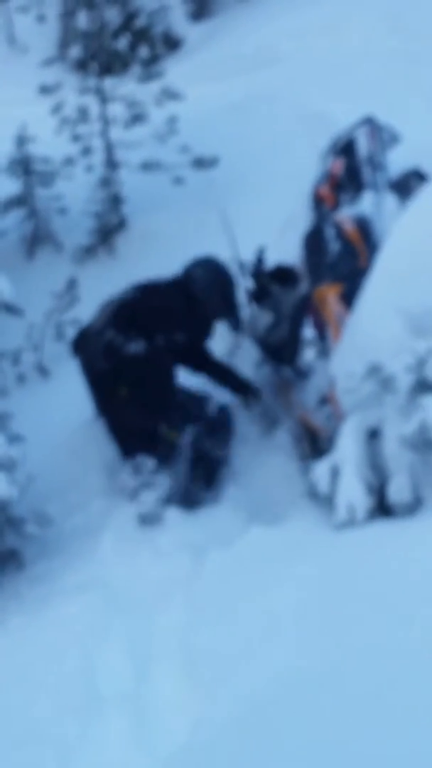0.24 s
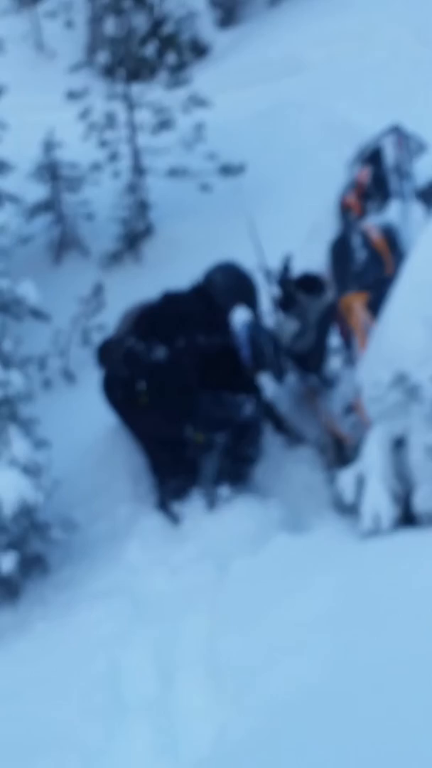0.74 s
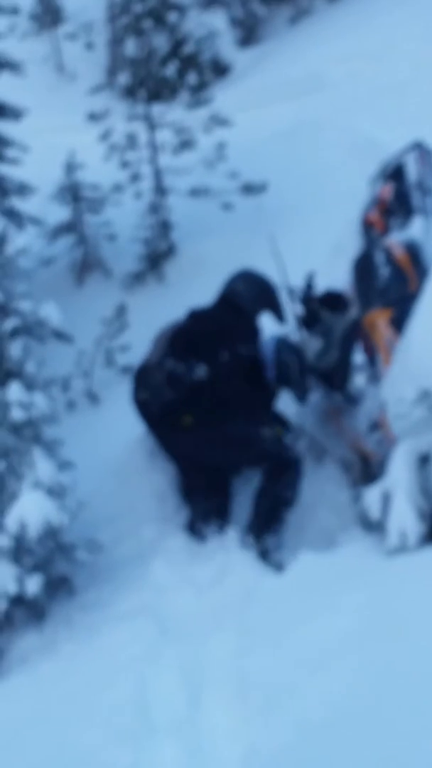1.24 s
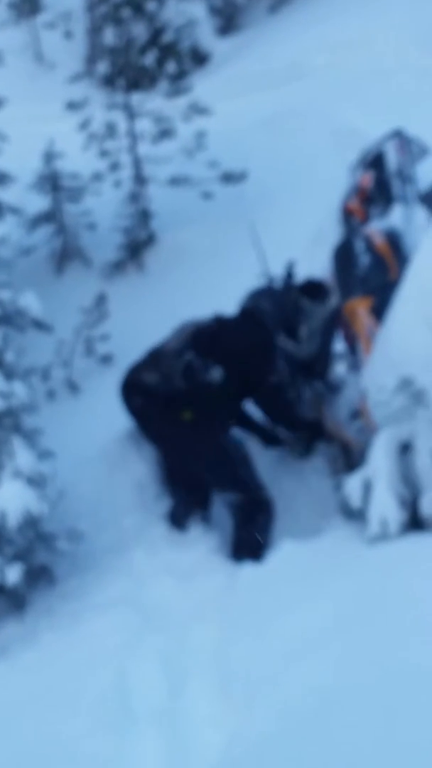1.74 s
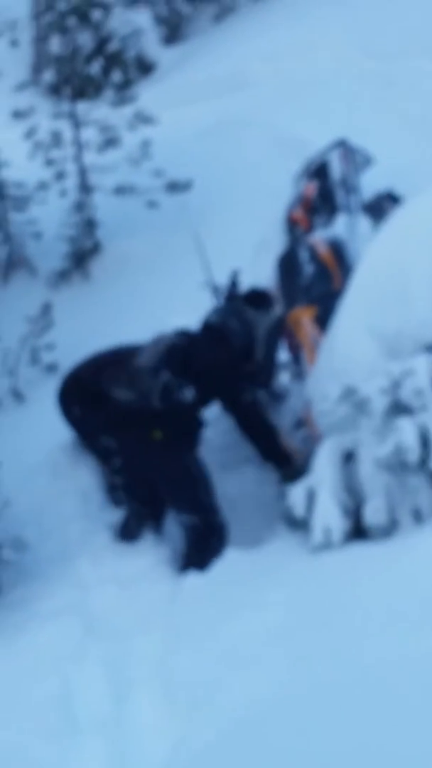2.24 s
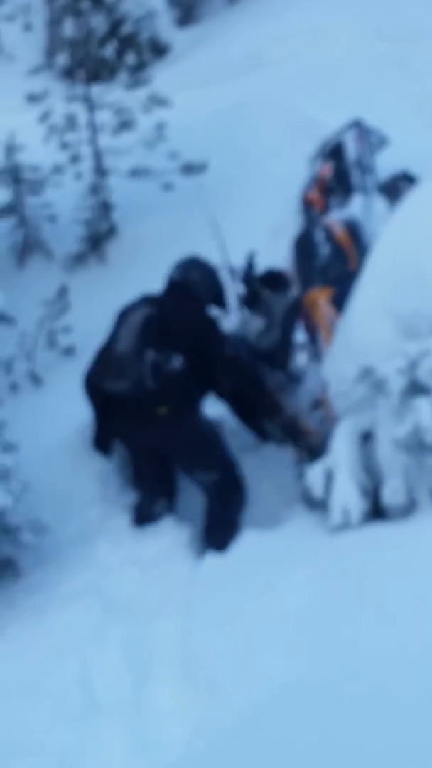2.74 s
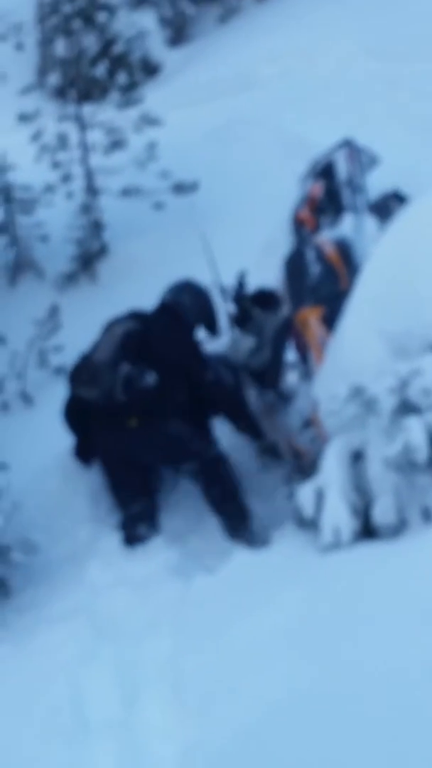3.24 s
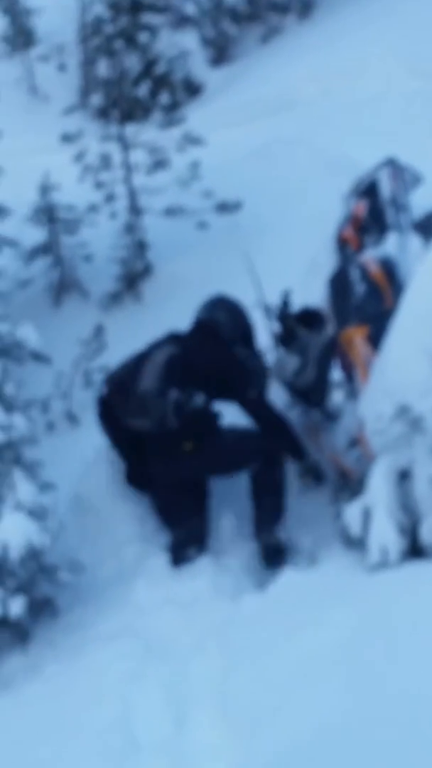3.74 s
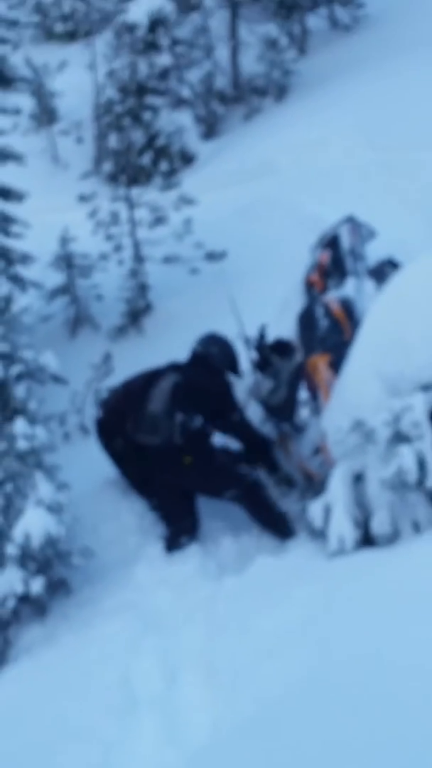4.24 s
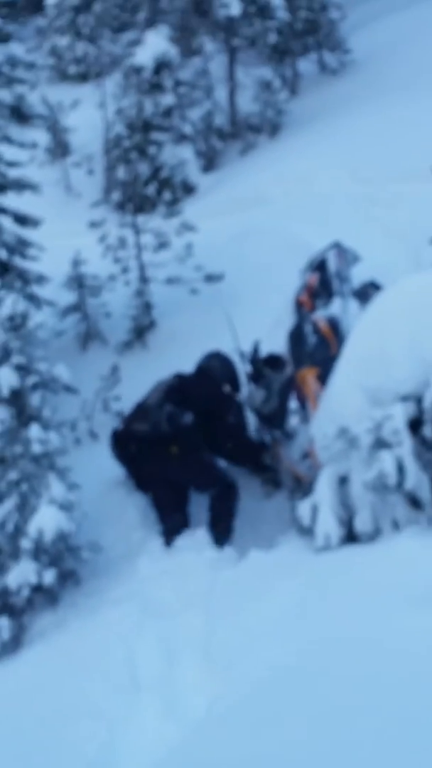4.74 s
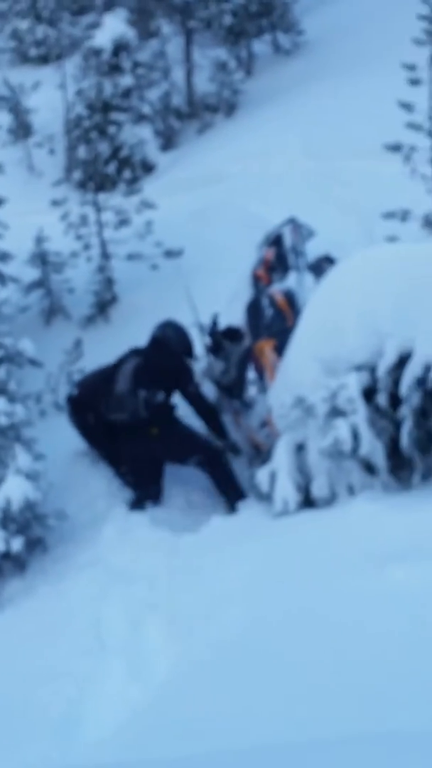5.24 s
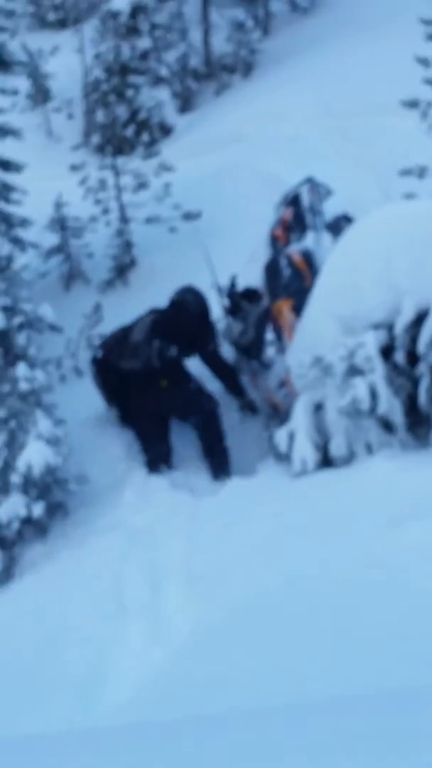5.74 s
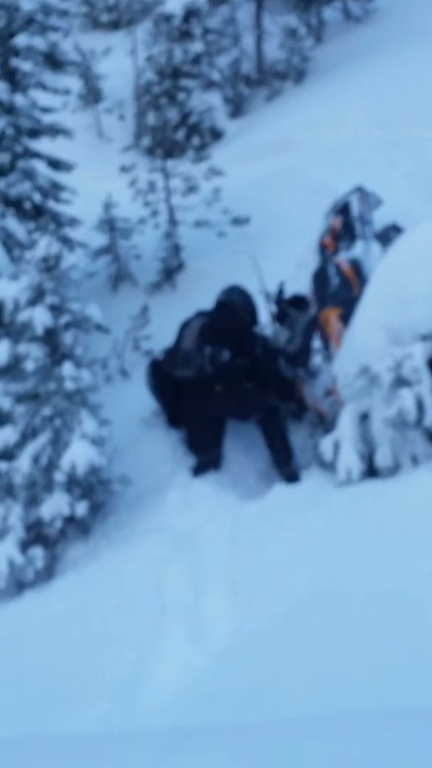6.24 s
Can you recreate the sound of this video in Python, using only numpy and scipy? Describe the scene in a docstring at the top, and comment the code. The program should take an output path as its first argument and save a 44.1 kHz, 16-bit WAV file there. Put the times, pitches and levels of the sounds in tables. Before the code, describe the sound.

Steady low engine drone with raspy gas noise and hiss, outdoors and fairly dry, heard by a handheld phone. A quick rev jumps up and drops back, then the speed winds down over several seconds, the burns growing uneven and the tone deeper. Faint taps and ticks join in; the image widens from nearly mono. Stiff fabric finally drags and catches close up.

```python
"""Out in deep snow, a two-cylinder two-stroke snowmobile engine runs some metres off: a fast idle, one blip
of the throttle, then a slow fall to a lumpy idle with uneven burns and a tick once a turn.
The exhaust is a stack of crank orders with booming bursts; gas rush is coloured noise pulsing with the firing.
Near the phone, stiff clothing knocks, drags and catches: grainy noise through small resonances."""
import sys
import numpy as np
from scipy.fft import rfft, irfft, next_fast_len
from scipy.io import wavfile
from scipy.ndimage import uniform_filter1d, map_coordinates

SR = 44100
rng = np.random.default_rng(int(sys.argv[2]) if len(sys.argv) > 2 else 0)


def transcribe(signal):
    """Save signal, clipped to [-1, 1], as a 16-bit WAV file at the path in sys.argv[1]."""
    frames = np.atleast_2d(signal).T
    limited = np.clip(frames, -1, 1)
    pcm = np.round(limited * 32767).astype(np.int16)
    wavfile.write(sys.argv[1], SR, pcm)


N = 285627

# Engine speed and firing tone: (time [s], speed [crank turns/s], level [dB])
CRANK = [(0, 66, -28), (.36, 65.9, -27.5), (.7, 66.2, -30.5), (.97, 63.8, -31), (1.22, 64.7, -25.5),
         (1.3, 68, -18.5), (1.41, 77.5, -24), (1.48, 73, -25.5), (1.66, 60.7, -29), (1.8, 59.6, -34),
         (2.12, 55, -27.5), (2.32, 52, -39), (2.4, 52.4, -33), (2.86, 48.5, -37.5), (3.12, 48.8, -41.5),
         (3.77, 42.6, -34), (4.16, 41.2, -30.5), (4.43, 40.8, -34.5), (4.72, 39.5, -33.5),
         (5.13, 40.1, -33), (5.8, 37.2, -33.5), (6.25, 34.1, -39), (6.477, 35, -36)]
# Weaker crank orders, before pipe and load: (order [per turn], relative level [dB])
MINOR_ORDERS = [(1, -7), (3, -4.5), (4, -4.5), (5, -3), (6, -0.5), (7, -6.5), (8, -3.5), (9, -11.5),
                (10, -8.5), (11, -11.5), (12, -6)]
# How the pipe passes the weaker orders: (frequency [Hz], gain [dB])
PIPE = [(36, -50.5), (60, -42), (150, -36.5), (250, -49), (350, -43.5), (480, -48.5), (560, -48),
        (900, -57), (1300, -56), (1740, -51), (1900, -57.5), (2100, -69.5)]
# Spells when an order sings out, by order [per turn]: (start [s], end [s], level [dB])
SINGING_ORDERS = {4: [(1.23, 1.45, -30.5), (1.6, 2.65, -41), (3.6, 4.1, -41.5), (4.0, 4.75, -36),
                  (4.7, 5.7, -41.5), (5.65, 6.7, -41.5)], 5: [(.2, 2.9, -48), (2.6, 3.5, -43),
                  (3.95, 4.5, -43)], 6: [(-.3, 1.39, -32.5), (1.45, 1.7, -31.5), (1.9, 3.65, -42),
                  (3.5, 4.7, -42), (4.65, 6.76, -48.5)], 8: [(-.1, .68, -45.5), (1.22, 1.4, -41),
                  (1.85, 2.8, -47), (3.15, 3.55, -42.5), (3.45, 4.1, -34.5), (4.05, 5.45, -42)],
                  10: [(1.25, 1.75, -47.5), (3.2, 3.9, -49), (5.95, 6.7, -43)], 14: [(.95, 1.42, -44.5),
                  (2.05, 2.55, -50)], 16: [(.95, 1.3, -47), (1.32, 1.55, -40)], 18: [(1.3, 1.5, -36.5)]}
DRIFT_DB = 2.5  # how far the weak orders swell and sink
FADE_S = 0.072  # rise of a spell, and its usual fall

# Strong burns: (time [s], relative peak level [dB])
STRONG_BURNS = [(0.128, -25), (0.25, -14.5), (1.572, -14), (1.723, -14.5), (1.868, -12.5), (1.995, -13),
                (2.125, -17), (2.233, -12), (2.3, -13.5), (2.469, -15.5), (2.734, -14.5), (2.879, -13),
                (3.029, -12.5), (3.41, -16.5), (3.536, -14.5), (3.745, -18.5), (3.913, -16.5),
                (4.114, -15.5), (4.286, -17), (4.408, -16.5), (4.591, -22), (4.989, -17), (5.074, -16.5),
                (5.144, -19), (5.195, -21.5), (5.451, -19.5), (5.53, -19), (5.626, -12.5), (5.758, -16.5),
                (5.821, -20), (5.936, -19), (6, -22), (6.04, -21), (6.158, -23.5), (6.228, -20.5),
                (6.454, -14.5)]
# Muffler colour on the burn scatter: (frequency [Hz], density [dB per Hz])
MUFFLER = [(25, -38.5), (45, -13), (65, -7.5), (85, -12.5), (110, 3.5), (140, -3.5), (195, -13),
           (287, -15.5), (340, -12), (470, -18), (530, -24.5), (700, -24), (1000, -85.5)]
UNEVEN_DB = -30  # burn scatter, before the speed corrections
UNEVEN_DIP, FAST_IDLE = 0.05, 66  # dB lost per turn/s above this speed [turns/s]
UNEVEN_SINK = 0.16  # dB lost per turn/s below MEAN_TURNS
MEAN_TURNS = 50  # turns/s at which the mean gas levels hold

# Gas noise colours, each: (frequency [Hz], density [dB per Hz])
DRONE = [(280, -30.5), (480, -0.5), (562, -12), (753, -0.5), (900, -3.5), (1100, -1.5), (1180, 1),
         (1270, -4.5), (2860, -120)]
INTAKE = [(740, -44), (1250, -13), (1375, 1.5), (1600, 1), (1730, 4), (1850, -1), (2030, -2), (2200, -14.5),
          (2860, -42.5), (4800, -120)]
BUZZ = [(1290, -39.5), (2200, 0.5), (2460, 9.5), (2790, -12.5), (3030, -12.5), (3300, -9), (4290, -56.5),
        (7260, -120)]
HISS = [(1820, -33.5), (3100, 2), (4210, 0), (4680, -3), (5550, -8.5), (6430, -24.5), (6800, -61.5),
        (15000, -120)]
AIR = [(5590, -64), (9500, -25.5), (10200, -21), (11000, -3), (12500, 11), (14000, 7.5), (14900, -11.5)]
# A narrow whir over the buzz: (frequency [Hz], density [dB per Hz])
WHIR = [(2400, -34.5), (2700, 5.5), (3080, -2), (3300, -29), (6000, -120)]
# Swing of the gas noise: (time [s], roar swing [dB], treble swing [dB])
FLOW_SWING = [(0, -1.5, -7), (.63, 1, -2), (.71, -2, 9), (.8, -9.5, 10), (.9, 3, 4), (1.22, 2, 4.5),
              (1.31, 5.5, 7.5), (1.39, 12.5, 9), (1.46, 1, 12), (1.6, 4.5, 4), (1.84, 3.5, 1), (2.38, 5, 3),
              (2.6, 2, 4.5), (3.1, 1.5, -4), (3.79, -1, -5.5), (4.13, -5, -3), (5.25, -12, -5.5),
              (5.4, -7.5, 12.5), (5.6, -10.5, 6.5), (6.477, -13, 2.5)]
# Rows drone, intake rasp, buzz, hiss, air:
# (mean level [dB], share of roar swing [dB/dB], share of treble swing [dB/dB], rise with speed [dB per turn/s])
FLOW_RESPONSE = [(-44.5, 0.35, 0.11, 0.2676), (-44.5, 0.97, .01, 0.15), (-55, 0.61, 0.021, 0.3239),
                 (-60.5, 0.11, 0.74, 0.1471), (-55.5, .01, 0.72, 0.2678)]
# The hiss stands higher for a while: (start [s], end [s], lift [dB])
HISS_LIFT = (0.69, 3.18, 5)
HISS_RELEASE_S = 0.55  # it sinks back slowly
WHIR_DB, WHIR_DROPS_S, WHIR_DROP_DB = -58.5, 2.93, 18.5  # mean level, time and depth of its drop

# Fizzing tick: (time [s], level [dB])
TICKING = [(0, -71.5), (3.7, -63.5), (4.1, -58), (5.05, -61), (5.2, -69), (5.6, -61.5), (6.477, -64.5)]
# Steady hums that come and go: (start [s], end [s], frequency [Hz], level [dB])
HUMS = [(0.2, 0.57, 111.4, -34), (2, 7, 108, -32.5), (3.35, 4.1, 481.8, -45.5), (4.9, 5.3, 493, -46.5)]
# One short swell of narrow hiss: (start [s], end [s], level [dB], frequency [Hz], width [Hz])
WHOOSH = (.65, .92, -53, 3850, 900)
# Spells of sharp firing: (start [s], end [s], level [dB], frequency [Hz], width [Hz])
BARK = [(1.9, 3.15, -45.5, 1910, 280), (1.9, 2.6, -48, 1150, 180)]
# Dull taps: (time [s], level [dB])
TAPPING = [(4.1, -96), (4.3, -65), (4.65, -62.5), (4.8, -62.5), (5.22, -64), (5.34, -90)]
# Metal resonances the taps ring: (frequency [Hz], width [Hz], relative level [dB])
METAL = [(2450, 300, -6), (3330, 260, 1), (4700, 600, -10)]

# Dull knock: (time [s], peak level [dB])
KNOCK = [(5.376, -14)]
# Cloth dragging: (start [s], end [s], fizz [dB], four weave bands from low to high [dB], ring [dB])
STROKES = [(6.034, 6.125, -48, -60, -62, -63, -57, -70), (6.131, 6.166, -31, -48, -53, -52, -44, -58),
           (6.154, 6.188, -29, -45, -50, -46, -41, -45), (6.178, 6.196, -31, -46, -52, -39, -45, -41),
           (6.192, 6.21, -47, -47, -56, -56, -54, -50), (6.236, 6.252, -33, -45, -38, -43, -42, -39),
           (6.248, 6.266, -35, -46, -44, -43, -46, -39), (6.205, 6.335, -53, -61, -63, -62, -60, -60)]
# Four cloth bands from low to high, then the hollow ring: (frequency [Hz], width [Hz], relative level [dB])
WEAVE = [
    [(1840, 200, 0), (2170, 140, 1), (2500, 220, -1)],
    [(2910, 130, 0)],
    [(3390, 200, 0)],
    [(3750, 110, 0), (4130, 150, 1), (4460, 150, -2), (4900, 300, -8)],
    [(1135, 60, 0)],
]
WEAVE_TOP_HZ = 5400  # the weave dulls above this
SLIPS_PER_S, SLIP_DB = 600, 16.5  # threads let go at random, each a spike over the rubbing noise
# Cloth catching: (time [s], relative peak level [dB])
SNAGS = [(6.035, -21), (6.041, -25), (6.054, -31), (6.064, -27), (6.076, -22), (6.089, -25), (6.101, -25),
         (6.127, -27), (6.325, -37)]
SNAG_T60 = .012  # s to die by 60 dB

# Port difference under the sum: (frequency [Hz], gain [dB])
UNLIKE = [(60, -27), (180, -33), (540, -21), (1610, -14.5), (4840, -7.5), (14500, -12.5)]
# Stereo width of the engine, nearly mono at first, wide from about 4 s:
# (time [s], gain of the port difference [dB])
WIDTH = [(0, -62.5), (3.85, -56.5), (4.1, -6.5), (5.4, 1.5), (6.477, -2)]
TOP_HZ = 15000  # band limit of the phone


def amp(db):
    """Decibels to gain."""
    return 10 ** (np.asarray(db) / 20)


def unit(x):
    """Scaled to rms 1."""
    return x / np.sqrt(np.mean(x ** 2) + 1e-20)


def curves(rows):
    """One value per sample for each column after the time."""
    s, *cols = np.transpose(rows)
    return [np.interp(np.arange(N) / SR, s, c) for c in cols]


def wobble(rate):
    """A smooth random curve, rate knots a second."""
    knots = rng.standard_normal(int(N * rate / SR) + 4)
    return map_coordinates(knots, [np.arange(N) * rate / SR])


def filtered(x, response):
    """x times a response of frequency."""
    m = next_fast_len(N + SR // 2)
    return irfft(rfft(x, m) * response(np.fft.rfftfreq(m, 1 / SR)), m)[..., :N]


def along(points, hz):
    """(Hz, dB) points read on a log axis."""
    f, db = np.transpose(points)
    return np.interp(np.log(hz + 1), np.log(f + 1), db)


def coloured(x, points):
    """x through a (Hz, dB) spectrum, at rms 1."""
    return unit(filtered(x, lambda hz: amp(along(points, hz))))


def resonances(rows):
    """Causal response of (Hz, width Hz, dB) resonances."""
    return lambda f: sum(amp(db) * w / (w + 2j * (f - c)) for c, w, db in rows)


def spell(start, end, release=FADE_S):
    """A gate that fades in from start and is closed again by end."""
    t = np.arange(N) / SR
    return np.clip(np.minimum((t - start) / FADE_S, (end - t) / release), 0, 1)


def puffs(turns, sharpness):
    """A gate that opens once in each whole step of turns, sudden and then dying."""
    return np.exp(-sharpness * (turns % 1))


def flow_db():
    """Levels of the gas noises, from the roar, the treble and the engine speed."""
    roar, treble = curves(FLOW_SWING)
    faster = curves(CRANK)[0] - MEAN_TURNS
    drone, rasp, buzz, hiss, air = [db + a * roar + b * treble + c * faster for db, a, b, c in FLOW_RESPONSE]
    start, end, lift_db = HISS_LIFT
    hiss = hiss + lift_db * spell(start, end, HISS_RELEASE_S)
    whir = WHIR_DB + 0.7 * roar + 0.34 * faster
    whir = whir - WHIR_DROP_DB * spell(WHIR_DROPS_S, np.inf)  # stays down to the end
    return drone, rasp, buzz, hiss, air, whir


def exhaust(turns):
    """Steady firing sounds the second crank order; the others pass the pipe weakly and sing out in spells."""
    speed, firing_db = curves(CRANK)
    load_db = .5 * (flow_db()[0] + 38.0)  # the weak orders follow the drone
    # high orders bite at speed, the odd ones less
    upper = [(k, .2 * (speed - 62) - 4 * (k % 2)) for k in range(13, 29)]
    gains = {}
    for k, db in MINOR_ORDERS + upper:
        # the weak orders swell and sink as the burn pattern drifts
        gains[k] = amp(db + load_db + along(PIPE, k * speed) + DRIFT_DB * wobble(4))
    for k, spells in SINGING_ORDERS.items():
        singing = sum(amp(db) * spell(start, end) for start, end, db in spells)
        gains[k] = np.maximum(gains[k], singing)
    gains[2] = amp(firing_db)
    # slower running burns less evenly, in level and in timing
    slower = 62 - speed
    lumpy_db = 1.2 + np.clip(slower, 0, 12) * .08
    unsteady = (.012 + .001 * np.clip(slower, 0, 10)) * wobble(10)  # in turns
    out = np.zeros(N)
    for k, gain in gains.items():
        tone = np.sin(2 * np.pi * k * (turns + unsteady) + .7 * k * k)
        out += np.sqrt(2) * gain * amp(lumpy_db * wobble(14)) * tone
    return out


def burns(turns):
    """Firings of random strength rumble in noise through the muffler; the strongest make it boom."""
    speed = curves(CRANK)[0]
    firing = np.flatnonzero(np.diff(np.floor(2 * turns)))
    kicks = np.zeros(N)
    kicks[firing] = rng.standard_normal(N)[firing]
    uneven = coloured(unit(kicks) + 1.39 * rng.standard_normal(N), MUFFLER)
    uneven_db = UNEVEN_DB - UNEVEN_DIP * np.clip(speed - FAST_IDLE, 0, None) + 1.6 * wobble(8)
    uneven_db -= UNEVEN_SINK * np.clip(MEAN_TURNS - speed, 0, None)
    t, booms = np.arange(SR // 8) / SR, np.zeros(N + SR)
    shape = np.exp(-((t - .014) / 0.0094) ** 2)  # a rounded burst some 20 ms long
    pitches = 112 + 11.0 * rng.standard_normal(len(STRONG_BURNS))  # Hz
    for (s, db), hz in zip(STRONG_BURNS, pitches):
        boom = np.sin(2 * np.pi * hz * t) + .1 * shape * np.sin(2 * np.pi * 2.6 * hz * t)
        booms[round(s * SR):][:len(t)] += amp(db - 1.5) * shape * boom
    return uneven * amp(uneven_db) + booms[:N]


def rush(turns):
    """Gas drawn in and blown out: noise that pulses with each firing and flutters."""
    flutter = wobble(8.3)
    pulse = puffs(2 * turns, 0.56)
    spectra = (DRONE, INTAKE, BUZZ, HISS, AIR, WHIR)
    steady = (0.37, 1.8, 1.6, 0.99, 1.5, 1.3)  # part that does not pulse, against a pulse of 1
    out = np.zeros(N)
    for share, spectrum, db in zip(steady, spectra, flow_db()):
        noise = coloured((share + pulse) * rng.standard_normal(N), spectrum)
        out += noise * amp(db + 0.65 * flutter + 1.1 * wobble(20))
    return out


def tick(turns):
    """A short metal tick once a turn: a burst of airy noise, its strength drawn anew each turn."""
    strength = amp(2.2 * rng.standard_normal(N)[turns.astype(int)])
    fizz = puffs(turns + 0.11, 12) * strength * rng.standard_normal(N)
    return amp(curves(TICKING)[0]) * coloured(fizz, AIR)


def hums():
    """Tones that hold their pitch while the engine slows, trembling slightly in level and phase."""
    t, out = np.arange(N) / SR, np.zeros(N)
    for start, end, hz, db in HUMS:
        arch = np.sin(np.pi * np.clip((t - start) / (end - start), 0, 1)) ** .5
        tone = np.sin(2 * np.pi * hz * t + .6 * wobble(15))
        out += np.sqrt(2) * amp(db + 0.27 * wobble(7.4)) * tone * arch
    return out


def narrow_spell(drive, row):
    """One drive rings a resonance applied twice, heard only during its spell."""
    start, end, db, hz, width = row
    ring = filtered(drive, lambda f: resonances([(hz, width, 0)])(f) ** 2)
    return amp(db) * spell(start, end) * unit(ring)


def whoosh():
    """Noise through a narrow resonance swells once."""
    return narrow_spell(rng.standard_normal(N), WHOOSH)


def bark(turns):
    """Sharp firing pulses of uneven size, one cylinder the stronger, ring narrow resonances."""
    firings = np.floor(2 * turns)
    cylinder = 1 - .5 * (firings % 2)
    pulses = np.diff(firings, prepend=0) * cylinder * amp(3 * rng.standard_normal(N))
    return sum(narrow_spell(pulses, row) for row in BARK)


def taps(turns):
    """A dull tap rings metal once a turn, with a weaker one half a turn later."""
    half_turns = np.floor(2 * (turns + .24))
    strikes = np.diff(half_turns, prepend=half_turns[0]) * (1 - .55 * (half_turns % 2))
    # every strike excites each mode with its own random strength
    ring = sum(filtered(strikes * amp(3 * rng.standard_normal(N)), resonances([mode])) for mode in METAL)
    dull = filtered(ring, lambda f: (f > 2000) * (f < 5600))
    return amp(curves(TAPPING)[0]) * unit(dull)


def knock():
    """A dull knock: a few cycles of a low tone under a rounded burst."""
    t, out = np.arange(SR // 20) / SR, np.zeros(N)
    burst = np.exp(-((t - .006) / .0024) ** 2) * np.sin(2 * np.pi * 255 * t)
    for s, peak_db in KNOCK:
        out[round(s * SR):][:len(t)] += amp(peak_db) * burst
    return out


def cloth_strokes():
    """Stiff cloth drags past the phone: rubbing noise and thread slips fizz and ring the weave."""
    slips = (rng.random(N) < SLIPS_PER_S / SR) * rng.standard_normal(N) * amp(SLIP_DB)
    grain = unit(amp(1.4 * wobble(500) + 2.7 * wobble(76)) * rng.standard_normal(N) + slips)
    lower_fizz = coloured(grain, [(6000, -40.0), (8500, -19.5), (10500, 10.0), (11500, -33.0)])
    fizz = coloured(grain, AIR) + amp(-15.5) * lower_fizz
    gains = np.zeros((len(WEAVE) + 1, N))
    for start, end, *db in STROKES:
        span = slice(round(start * SR), round(end * SR))
        arch = np.sin(np.linspace(.8, 2.6, span.stop - span.start))  # the stroke presses hardest midway
        gains[:, span] = np.maximum(gains[:, span], amp(db)[:, None] * arch)
    gains = uniform_filter1d(gains, size=150, axis=1)  # softens the stroke edges
    out = gains[0] * fizz
    for gain, rows in zip(gains[1:], WEAVE):
        weave = lambda f: resonances(rows)(f) / (1 + (f / WEAVE_TOP_HZ) ** 10)
        out += filtered(gain * grain, weave) / np.std(filtered(grain, weave))
    return out


def cloth_snags():
    """Cloth catches: sudden bursts of airy noise that die within milliseconds."""
    t, envelope = np.arange(SR // 20) / SR, np.zeros(N)
    for s, peak_db in SNAGS:
        envelope[round(s * SR):][:len(t)] += amp(peak_db - 5.5 - 60 * t / SNAG_T60)
    return filtered(envelope * coloured(rng.standard_normal(N), AIR), lambda hz: hz > 9500)


def scene():
    """The engine starts nearly mono and widens; the cloth fizzes at the left port and rasps at the right."""
    turns = np.cumsum(curves(CRANK)[0]) / SR
    engine = exhaust(turns) + burns(turns) + rush(turns) + tick(turns)
    engine += hums() + whoosh() + bark(turns) + taps(turns)
    unlike = filtered(engine * (1.5 * wobble(40) - .7), lambda hz: amp(along(UNLIKE, hz)))
    cloth = knock() + cloth_strokes() + cloth_snags()
    tilt = filtered(cloth, lambda hz: np.where(hz > 8000, .38, -.15 + .25j))
    difference = amp(curves(WIDTH)[0]) * unlike + tilt
    return engine + cloth + np.array([[1], [-1]]) * difference  # left adds it, right subtracts it


def record(dry):
    """The phone keeps nothing above its band limit."""
    return filtered(dry, lambda hz: hz < TOP_HZ)


dry = scene()
out = record(dry)
transcribe(out)
```